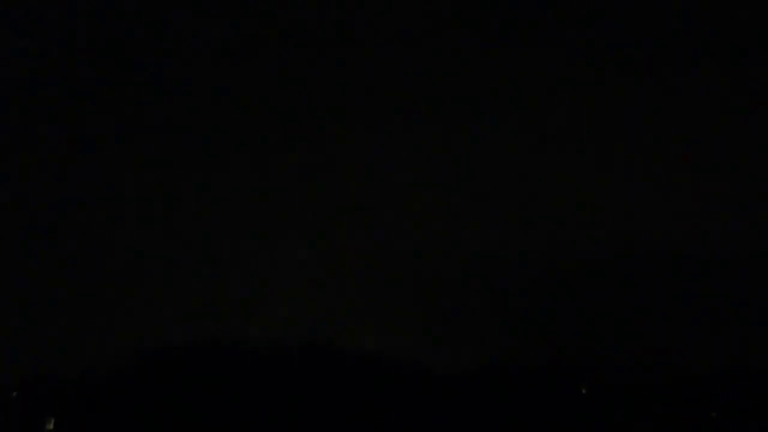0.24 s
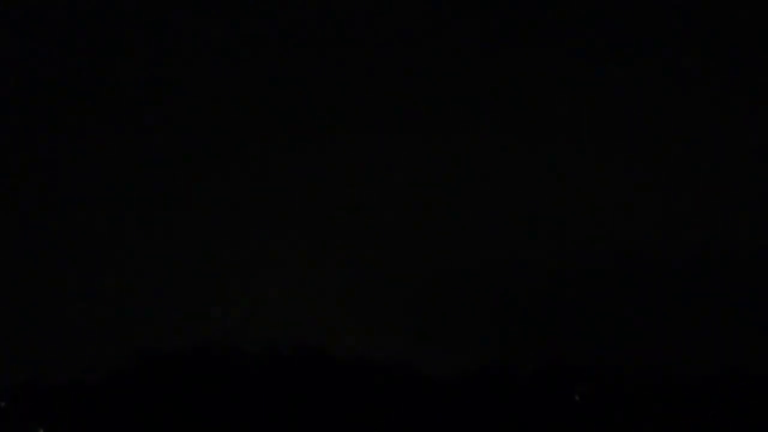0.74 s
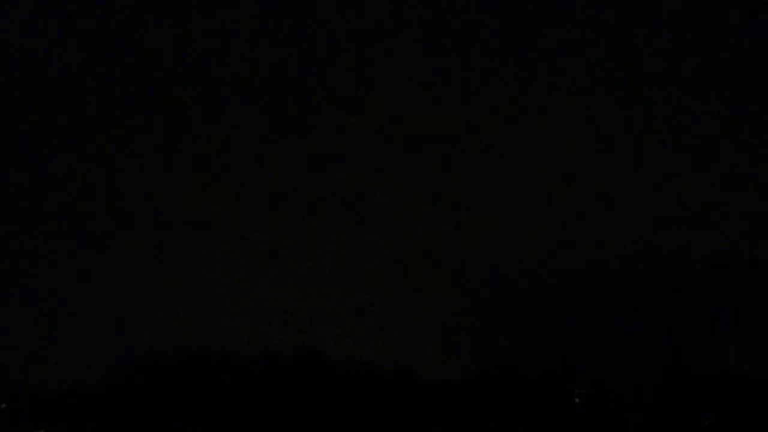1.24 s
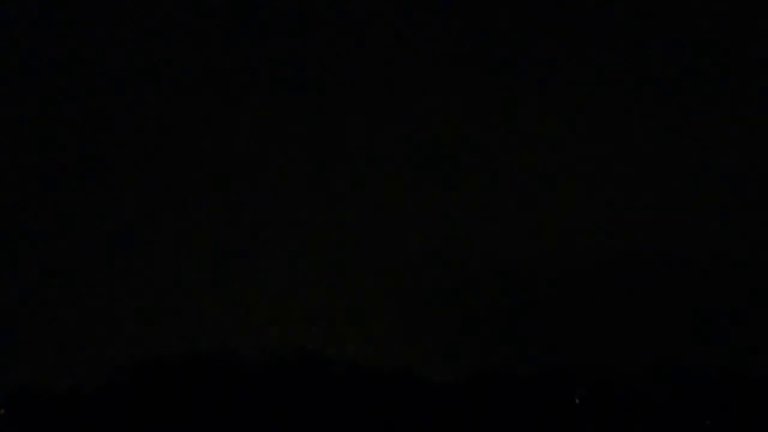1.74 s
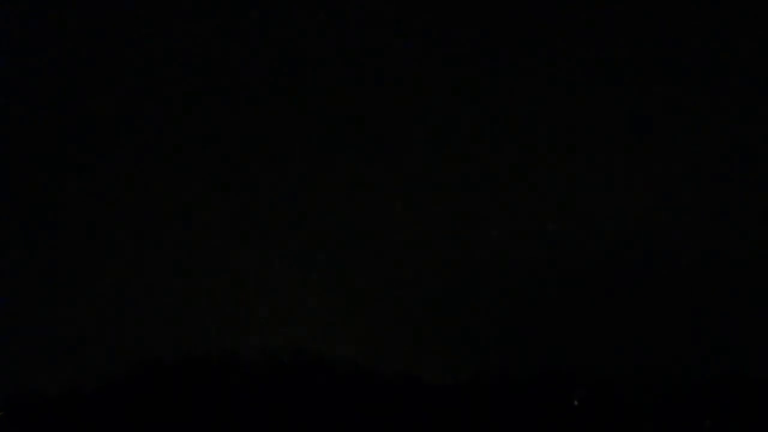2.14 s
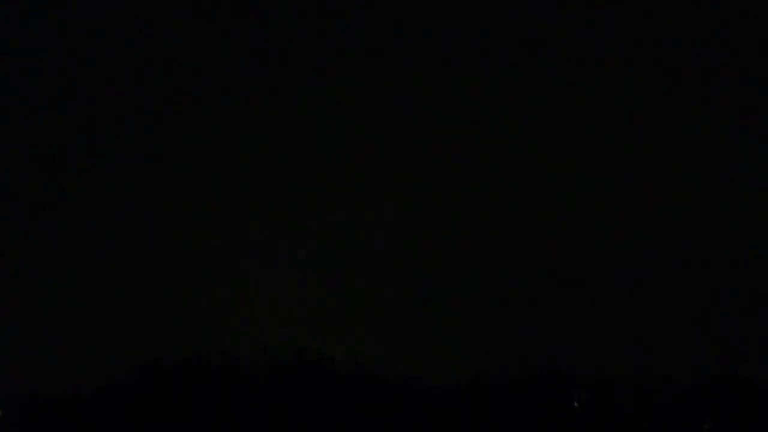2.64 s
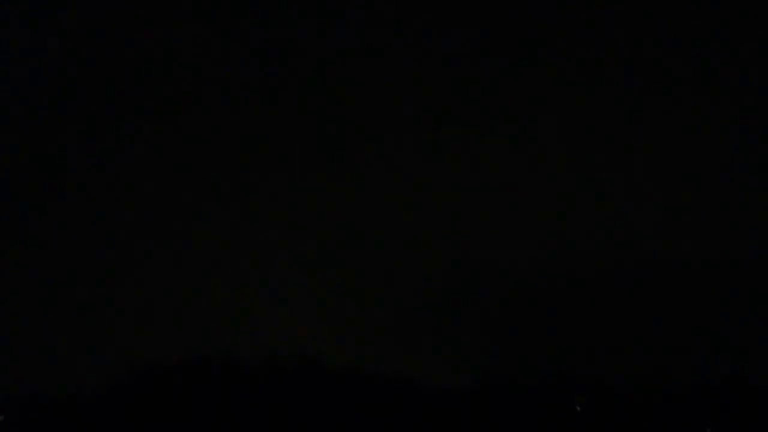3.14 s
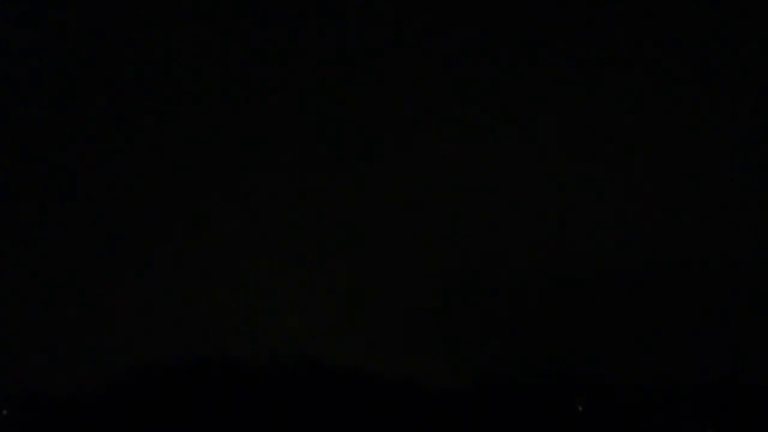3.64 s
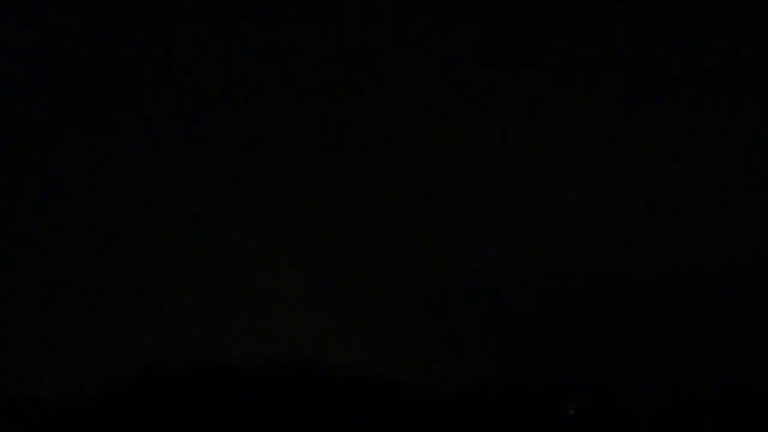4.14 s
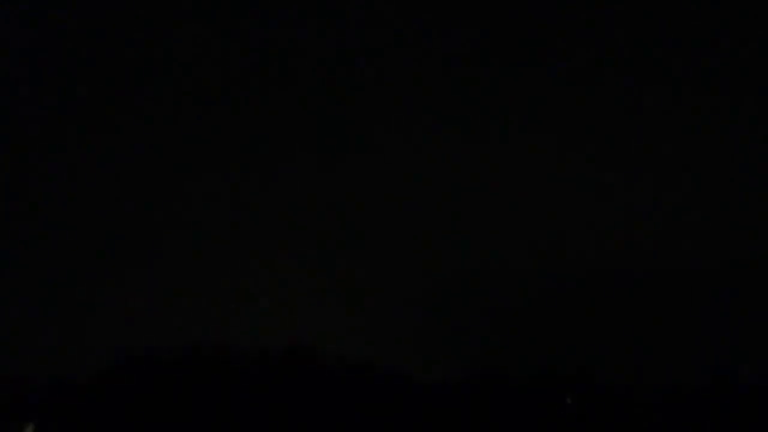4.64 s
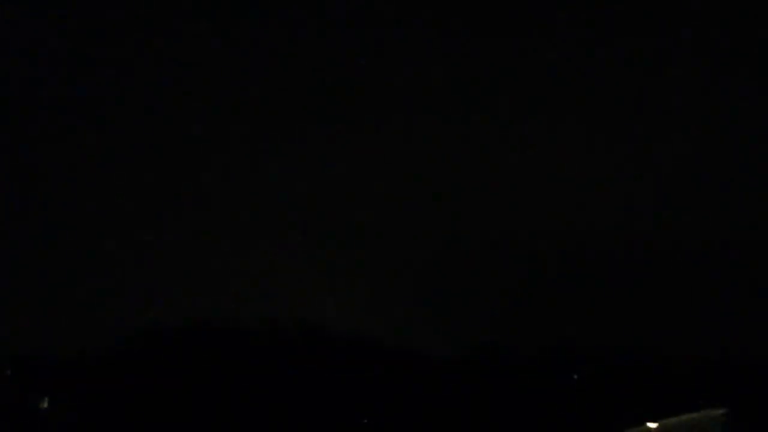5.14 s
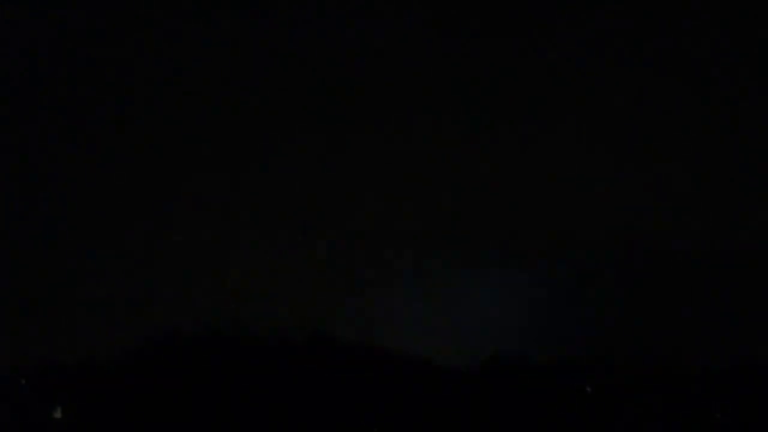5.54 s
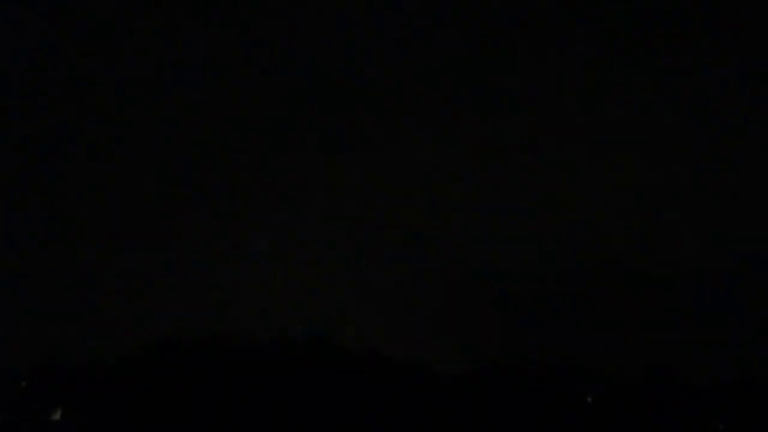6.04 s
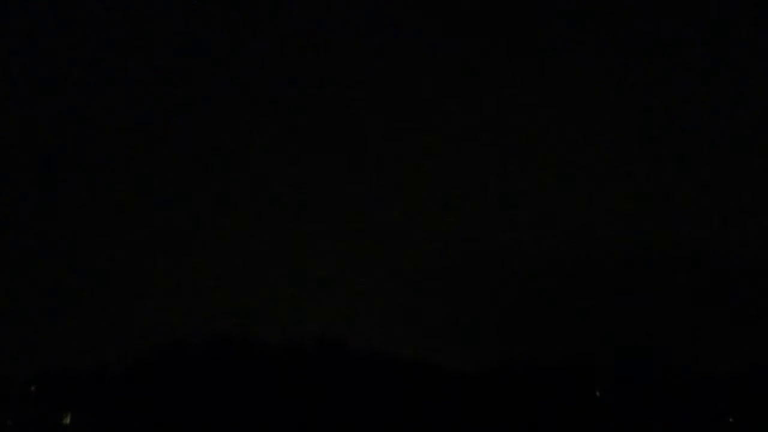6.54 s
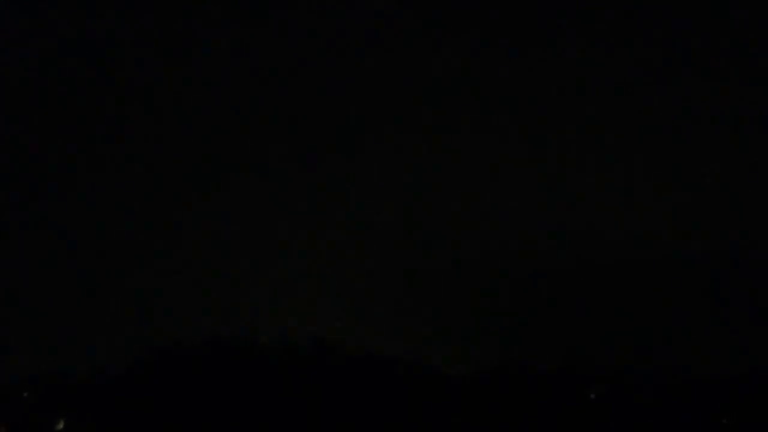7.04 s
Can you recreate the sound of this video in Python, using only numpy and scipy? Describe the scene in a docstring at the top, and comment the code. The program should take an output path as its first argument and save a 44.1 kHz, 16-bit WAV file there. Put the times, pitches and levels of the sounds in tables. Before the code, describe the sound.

Distant thunder rolls without a break over open country at night. It swells into a heavy, booming peal from about 0.6 to 1.1 seconds, drops to a lower rumble, and rises mildly between 3.3 and 4.2 seconds. A second, longer peal breaks at 5.9 seconds, is loudest around 6.1 to 6.5, and dies down toward the end at 7.3 seconds. Close by and quieter than the thunder, a cricket rasps throughout in very high double strokes, about nine a second. A small hard object gives a quick clattering knock at 3.4 seconds and another knock at 5.8. A few faint, thin ticks are scattered between, the clearest at 5.2 seconds. A soft rush is present at the start, rising in pitch and mostly fading by 3.5 seconds. A faint steady hiss of air and a barely audible high whine lie underneath.

```python
"""Distant thunder rolls over open country at night and swells into two heavy peals. Shocks from all along the
lightning channel superpose, and the air absorbs their treble on the way; a soft, brighter rush trails the early
thunder and fades as it rolls on. Close by, a bush cricket rasps in quick double strokes, a scraper on a file
setting its wings ringing. A few small knocks and ticks sound near, over a faint hiss of night air and a thin
whine."""
import sys
import numpy as np
from scipy import signal
from scipy.fft import rfft, irfft, next_fast_len
from scipy.io import wavfile
from scipy.ndimage import uniform_filter1d

SR = 44100
rng = np.random.default_rng(int(sys.argv[2]) if len(sys.argv) > 2 else 0)


def wrap_up_sound(samples):
    """Save the sound to the file named by the first command line argument, as 16-bit audio."""
    columns = np.atleast_2d(samples).T
    # keep every value between -1 and 1, then stretch to whole-number steps
    tamed = np.clip(columns, -1, 1)
    steps = np.round(tamed * 32767).astype(np.int16)
    wavfile.write(sys.argv[1], SR, steps)


N = 322357
TIME = np.arange(N) / SR


def gain_of(db):
    """The decibel scale: 20 dB is a factor of ten in amplitude."""
    return 10 ** (np.asarray(db) / 20)


def unit_rms(x):
    """Normalisation to an rms of 1."""
    return x / np.sqrt(np.mean(x ** 2) + 1e-20)


def curve(rows, column=1):
    """Linear interpolation of one column of a table over time."""
    columns = np.transpose(rows)
    return np.interp(TIME, columns[0], columns[column])


def colour(x, spectrum):
    """Minimum-phase filtering by rows of (f/Hz, level/dB): the ringing follows each impulse."""
    hz, db = np.transpose(spectrum)
    size = 16384
    bin_hz = abs(np.fft.fftfreq(size, 1 / SR)) + 1
    log_gain = np.log(gain_of(np.interp(np.log(bin_hz), np.log(hz), np.maximum(db, -100))))
    response = np.exp(np.conj(signal.hilbert(log_gain)))
    ring = np.fft.ifft(response).real[:size // 4]
    return signal.oaconvolve(x, ring)[:N]


def band(x, lo_hz, hi_hz):
    """Ideal band-pass filtering between two frequencies."""
    size = next_fast_len(N)
    hz = np.fft.rfftfreq(size, 1 / SR)
    return irfft(rfft(x, size) * ((hz >= lo_hz) & (hz < hi_hz)), size)[:N]


def add(mix, start_s, sound):
    """Superposition: a sound joins the mix at a given time."""
    start = round(start_s * SR)
    sound = sound[max(-start, 0):]
    part = mix[max(start, 0):][:len(sound)]
    part += sound[:len(part)]


def scatter(x, t60, build_s=0.016):
    """Scattering by ground and foliage: dense echoes of unit energy build up and decay exponentially."""
    t = np.arange(SR // 2) / SR
    tail = rng.standard_normal(len(t)) * gain_of(-60 * t / t60) * np.minimum(t / build_s, 1) ** 2
    return signal.oaconvolve(x, tail / np.linalg.norm(tail))[:N]


def steady(x, window_s):
    """Division by the running rms evens out slow swells and leaves the fast grain."""
    size = max(int(window_s * SR), 64)
    power = uniform_filter1d(uniform_filter1d(x ** 2, size), size)
    return x / np.sqrt(abs(power) + 1e-20)


# Spectral density of the night air: f/Hz, relative level/dB
AIR_SPECTRUM = [(20, -41), (200, 1.5), (600, 9), (1000, 6), (1400, 1.5), (2000, 0), (2700, -1), (3600, -4),
                (6000, -6), (9000, -7.5), (16000, -9)]


def night_air(level_db=-60.5, reference_band_hz=(1250, 4260)):
    """Stationary filtered noise: a smooth hiss, its level set within a reference band."""
    hiss = colour(rng.standard_normal(N), AIR_SPECTRUM)
    return hiss / np.std(band(hiss, *reference_band_hz)) * gain_of(level_db)


# Swell of the rush: t/s, level/dB
RUSH_LEVEL = [(0, -44.5), (.6, -51), (1.1, -54), (1.6, -55), (2.0, -53), (2.4, -54.5), (2.9, -57.5),
              (3.6, -68), (4.3, -62), (4.9, -67), (5.5, -62.5), (6.5, -70), (7.31, -67)]
# Its spectral density at a frequency factor of 1: f/Hz, relative level/dB
RUSH_SPECTRUM = [(300, -32), (800, 5.5), (1300, 2.5), (1750, 0), (2700, -6.5), (3600, -11), (5000, -17.5),
                 (8000, -36)]
# Its climb in pitch: t/s, frequency factor
RUSH_PITCH = [(0, 0.4), (1.0, 0.61), (2.0, 0.85), (3.0, 0.78), (4.6, 1.15), (7.31, 1.46)]


def distant_rush(patch_db=1.5):
    """Spectral modulation of noise: a dull, patchy rush climbs in pitch as it fades unevenly."""
    hz, t, spectra = signal.stft(rng.standard_normal(N), SR, nperseg=512, noverlap=384)
    pitch = np.interp(t, *np.transpose(RUSH_PITCH))
    shape_db = np.interp(hz[:, None] / pitch, *np.transpose(RUSH_SPECTRUM))
    patches = uniform_filter1d(rng.standard_normal(spectra.shape), size=5, axis=0)
    patches = unit_rms(uniform_filter1d(patches, size=36, axis=1))
    spectra *= gain_of(shape_db + patch_db * patches)
    rush = signal.istft(spectra, SR, nperseg=512, noverlap=384)[1][:N]
    return unit_rms(rush) * gain_of(curve(RUSH_LEVEL))


def whine(centre_hz=7725, half_width_hz=55, level_db=-80.0):
    """Narrow-band noise is heard as a pitch: a very faint, thin, steady high whine."""
    noise = band(rng.standard_normal(N), centre_hz - half_width_hz, centre_hz + half_width_hz)
    return gain_of(level_db) * unit_rms(noise)


# Thin ticks: t/s, initial rms level/dB, centre f/Hz, width/octaves, t60/s
TICKS = [(.59, -52.5, 3900, .15, .05), (3.168, -56, 4270, .1, .05), (4.745, -56.5, 2440, .16, .2),
         (5.2, -44, 4400, 0.15, .06), (6.173, -51, 6800, 0.73, 0.085)]


def ticks():
    """Exponential decay of band-limited noise: short high puffs that die at once."""
    out, t = np.zeros(N), np.arange(8192) / SR
    hz = np.fft.rfftfreq(len(t), 1 / SR) + 1
    for start_s, db, centre_hz, octaves, t60 in TICKS:
        passband = np.exp(-.5 * (np.log2(hz / centre_hz) / octaves) ** 2)
        puff = irfft(rfft(rng.standard_normal(len(t))) * passband)
        add(out, start_s, unit_rms(puff) * gain_of(db - 60 * t / t60))
    return out


# Light blows nearby: t/s, peak level/dB, factor on t60, hardness/(dB per octave)
BLOWS = [(3.3615, -27.5, .5, -1.), (3.375, -36, .9, -6.), (3.382, -34, .45, 0.), (3.392, -36, .9, -8.),
         (5.766, -29.5, .6, 0.), (5.774, -43, .3, 3.)]
# Normal modes of the struck object: f/Hz, relative level/dB, t60/s at a factor of 1
KNOCK_MODES = [(845, 0, .07), (1000, -.5, .06), (1380, -8, .025), (2090, -4, .035), (2250, -8, .025),
               (2750, -11, .012), (3700, -10, .014), (4600, -13, .014)]


def knocks(echo_db=-17.0, echo_t60=0.11):
    """Damped normal modes: blows ring a small hard object, harder ones favouring the high modes."""
    out, t = np.zeros(N), np.arange(SR // 4) / SR
    for start_s, peak_db, t60_factor, hardness in BLOWS:
        ring = np.zeros(len(t))
        for hz, mode_db, t60 in KNOCK_MODES:
            envelope_db = mode_db + hardness * np.log2(hz) - 60 * t / (t60 * t60_factor)
            ring += gain_of(envelope_db) * np.sin(2 * np.pi * hz * t)
        add(out, start_s, gain_of(peak_db) * ring / abs(ring).max())
    return out + gain_of(echo_db) * scatter(out, echo_t60)


# The two strokes of a chirp: delay/s, rise/s, hold/s, release/s, relative level/dB
STROKES = [(0, 0.014, 0.0042, 0.0028, 1.5), (0.034, .015, 0.0077, 0.005, 0)]
# Drift of the chirps around their beat: t/s, lag/s
CHIRP_LAG = [(0, 0), (.7, .002), (1.2, -.0035), (2.8, .0015), (3.4, -.001), (3.8, .003), (4.75, .003),
             (5.0, -.004), (5.32, -.0035), (5.55, .003), (6.2, -.002), (7.31, 0)]
# Strength of the song: t/s, relative level/dB
SONG_LEVEL = [(0, -48), (1.8, -47), (3.2, -47.8), (4.2, -45.7), (6.5, -47.5), (7.31, -47)]


def scraper_pressure(first_s=-.0356, period_s=.113835):
    """Nearly periodic forcing: the scraper presses on the file in one double stroke per beat."""
    t, pressure = np.arange(0, period_s, 1 / SR), np.zeros(N)
    chirp = sum(gain_of(db) * np.interp(t - delay, np.cumsum([0, rise, hold, release]), [0, 1, 1, 0])
                for delay, rise, hold, release, db in STROKES)
    for beat_s in np.arange(first_s, N / SR, period_s):
        lag_s = np.interp(beat_s, *np.transpose(CHIRP_LAG))
        add(pressure, beat_s + lag_s, chirp)
    return pressure * gain_of(curve(SONG_LEVEL))


# Resonance curve of the wings: f/Hz, relative level/dB
WING_RESONANCE = [(4000, -29), (8300, -28.5), (9250, -18), (9740, -11), (10000, -15), (10280, 4),
                  (10750, -11.5), (11220, -1.5), (11500, -7.5), (11680, -14), (12000, -16), (13400, -19.5),
                  (14200, -23), (15700, -21)]
# The broader spectrum they radiate sideways into the foliage: f/Hz, relative level/dB
WING_SIDEWAYS = [(4000, -39), (8700, -25.5), (9900, -6), (10500, -4), (11300, -2.5), (12200, -13),
                 (13300, -18), (15700, -22)]


def cricket(tooth_hz=1000, jitter=.18, tooth_spread_db=4.0, friction=0.31, echo_db=-7.0, trim_db=-1.15):
    """Stridulation: a scraper runs over a file, and each tooth clicks the wings into a short ring."""
    pressure = scraper_pressure()
    speed = 1 + jitter * unit_rms(uniform_filter1d(rng.standard_normal(N), size=60))
    teeth_passed = np.floor(np.cumsum(tooth_hz * abs(speed)) / SR)
    strikes = np.diff(teeth_passed, prepend=0)
    clicks = unit_rms(strikes * gain_of(tooth_spread_db * rng.standard_normal(N)))
    drive = band(clicks + friction * rng.standard_normal(N), 3500, SR / 2)
    direct = unit_rms(pressure * steady(colour(drive, WING_RESONANCE), window_s=0.0033))
    echo = unit_rms(scatter(pressure * colour(drive, WING_SIDEWAYS), t60=0.36, build_s=.0085))
    return gain_of(curve(SONG_LEVEL).mean() + trim_db) * (direct + gain_of(echo_db) * echo)


# Single shock fronts that stand out of the roll: t/s, relative level/dB, centre f/Hz
SHOCK_FRONTS = [(0.643, -7.5, 191), (0.667, -12, 201), (0.777, -9, 214), (0.823, -5.5, 120),
                (1.016, -11, 260), (2.284, -21, 210), (3.775, -20, 159), (5.905, -11.5, 269),
                (5.993, -11, 314), (6.15, -5.5, 230), (6.34, -5.5, 135), (6.388, -5.5, 200),
                (6.497, -7, 190)]


def thunder_booms(trim_db=-8.5, rise_s=0.0038, echo_db=-8.0, echo_t60=0.1):
    """Pulse and reflection: a strong front arrives as a few low swings, then echoes off the land."""
    out, t = np.zeros(N), np.arange(SR // 10) / SR
    envelope = (t / rise_s * np.exp(1 - t / rise_s)) ** 2
    for start_s, db, hz in SHOCK_FRONTS:
        add(out, start_s, gain_of(db + trim_db) * envelope * np.sin(2 * np.pi * hz * t))
    return out + gain_of(echo_db) * scatter(out, echo_t60)


# The long roll under the peals: t/s, relative level/dB, nearness as treble lift/dB
ROLL = [(0, -36.5, 7), (.5, -43.5, 9), (1.0, -37, 5), (1.8, -39.5, 4), (2.75, -41, -1), (3.2, -36.5, 1.5),
        (3.55, -34, -0.5), (3.85, -34, -2), (4.18, -36, -1), (4.28, -39.5, 1), (5.2, -38, 1.5),
        (5.85, -37.5, 2.5), (6.15, -34, 1.5), (6.6, -32.5, -1.5), (6.8, -36.5, -1), (7.31, -42.5, 1)]
# Peals, each from one stretch of the lightning channel: t/s, length/s, relative level/dB
PEALS = [(-.01, 0.065, -35), (0.358, 0.093, -37), (0.559, 0.036, -33), (0.628, 0.097, -29.5),
         (0.752, 0.098, -26.5), (0.984, 0.11, -33.5), (1.356, 0.15, -36), (1.616, 0.024, -33.5),
         (1.856, 0.16, -36.5), (2.272, .03, -39), (3.059, 0.018, -39), (3.553, .025, -31.5),
         (3.756, 0.05, -32), (5.31, 0.042, -37.5), (5.903, .2, -29), (6.125, .04, -25.5),
         (6.194, 0.19, -28.5), (6.33, 0.06, -24), (6.416, 0.037, -27.5), (6.495, .025, -26.5),
         (6.538, 0.09, -33.5), (6.856, 0.041, -38.5)]


def thunder_level_db(swing_db=1.5, swing_s=0.058, attack_s=0.0061, fade_db_per_s=280):
    """Incoherent sources add in power: peals break in, hold and fade over a randomly surging roll."""
    size = int(swing_s * SR)
    swing = unit_rms(uniform_filter1d(uniform_filter1d(rng.standard_normal(N), size), size // 2))
    power = gain_of(curve(ROLL) + swing_db * swing) ** 2
    for start_s, length_s, db in PEALS:
        attack = np.clip((TIME - start_s) / attack_s, 0, 1)
        fade_db = fade_db_per_s * np.clip(TIME - start_s - length_s, 0, 1)
        power += (attack * gain_of(db - fade_db)) ** 2
    return 10 * np.log10(power)


# Spectral density of the arriving shocks: f/Hz, relative level/dB
SHOCK_SPECTRUM = [(20, -37), (45, -12), (72, -6), (97, -2), (125, -.5), (200, 0.5), (250, -3), (310, -3.5),
                  (380, -10), (480, -16), (760, -25.5), (1050, -39), (1500, -53), (3000, -80.5)]


def thunder_roll(shocks_per_s=3000, spread_db=1., bass_db=-43.5, bass_follows=0.5, body_gain_db=2.0,
                 dulling=0.32, pivot_hz=220, treble_hz=560):
    """Superposition and air absorption: shocks pile up, and the farther they come the duller they are."""
    sizes = rng.standard_normal(N) * gain_of(spread_db * np.minimum(rng.exponential(1, N), 3))
    arrivals = rng.random(N) < shocks_per_s / SR
    shocks = colour(sizes * arrivals, SHOCK_SPECTRUM)
    level_db = thunder_level_db()
    bass = steady(band(shocks, 0, 90), window_s=0.079)
    bass *= gain_of(bass_db + bass_follows * (level_db - np.median(level_db)))
    body = steady(band(shocks, 90, 3000), window_s=0.027)
    hz, t, spectra = signal.stft(body, SR, nperseg=1024, noverlap=768)
    peal_loss_db = dulling * (level_db - curve(ROLL))  # a peal is duller the more it tops the roll
    treble_db = np.interp(t, TIME, curve(ROLL, column=2) - peal_loss_db)
    # the spectrum tilts about the pivot: up for near shocks, down for far ones
    tilt = np.clip(np.log((hz + 1) / pivot_hz) / np.log(treble_hz / pivot_hz), -.4, 1.4)
    spectra *= gain_of(tilt[:, None] * treble_db)
    body = signal.istft(spectra, SR, nperseg=1024, noverlap=768)[1][:N]
    return bass + body * gain_of(level_db + body_gain_db)


def scene():
    """Linear superposition in one channel: thunder far off, the cricket and the small sounds near."""
    thunder = thunder_roll() + thunder_booms()
    return (thunder + night_air() + distant_rush() + cricket() + whine() + knocks() + ticks())[None]


def record(dry, cutoff_hz=15780):
    """Band limiting: a steep linear-phase low-pass removes the highest treble."""
    low_pass = signal.firwin(1023, cutoff_hz, window=("kaiser", 9), fs=SR)
    return signal.oaconvolve(dry, low_pass[None], "same")


dry = scene()
out = record(dry)
wrap_up_sound(out)
```